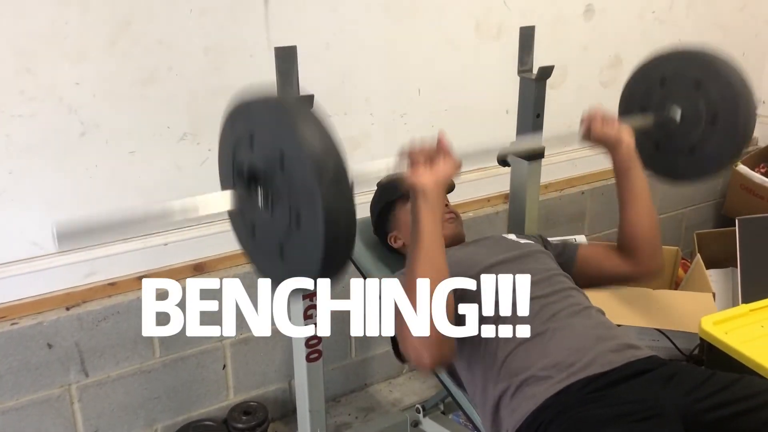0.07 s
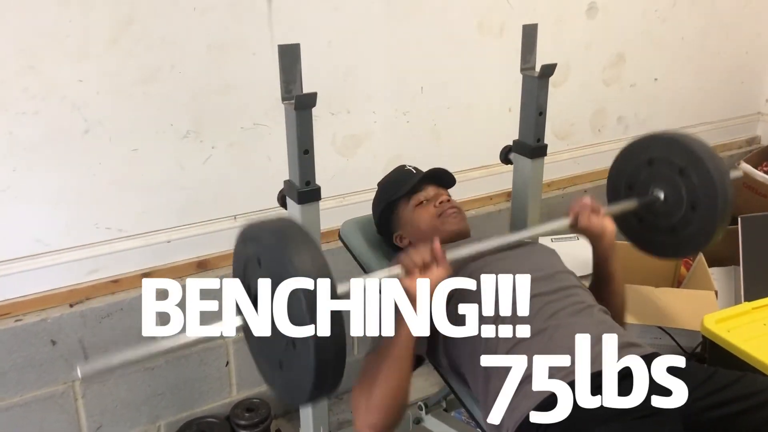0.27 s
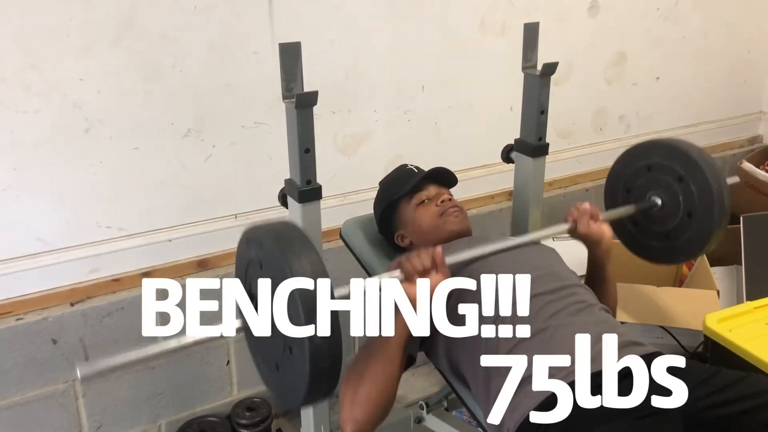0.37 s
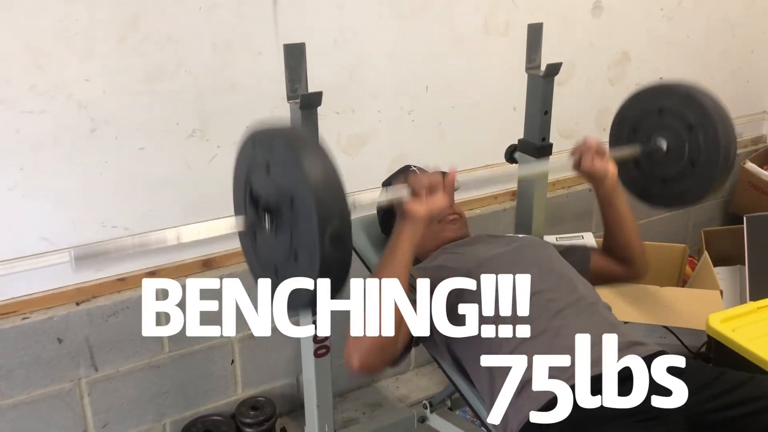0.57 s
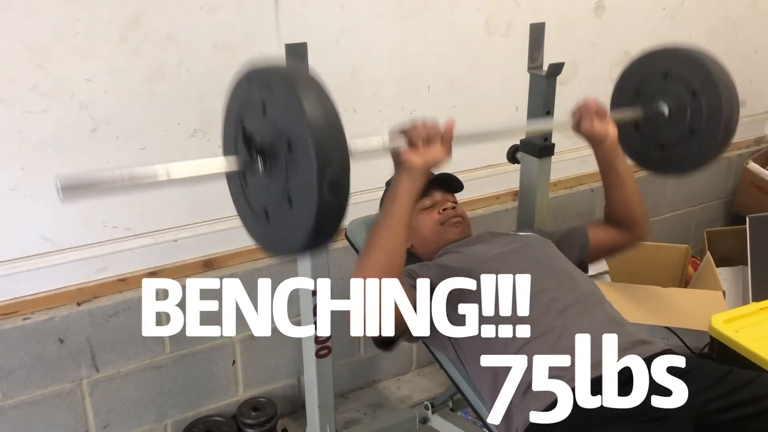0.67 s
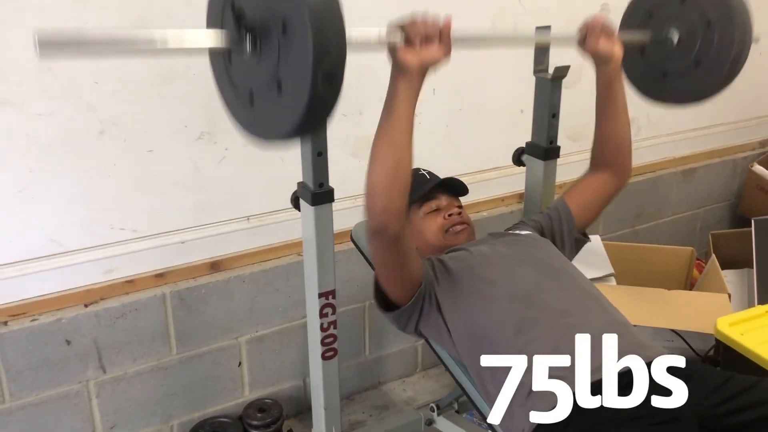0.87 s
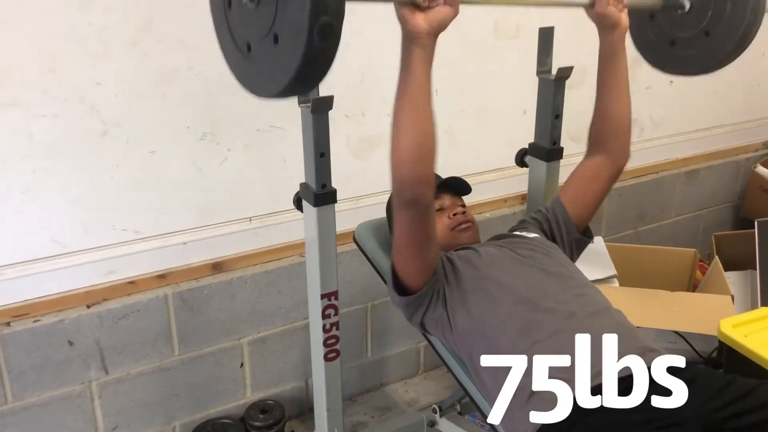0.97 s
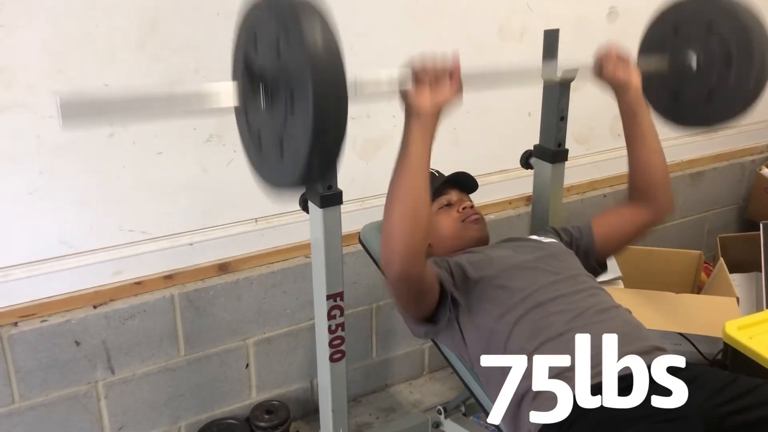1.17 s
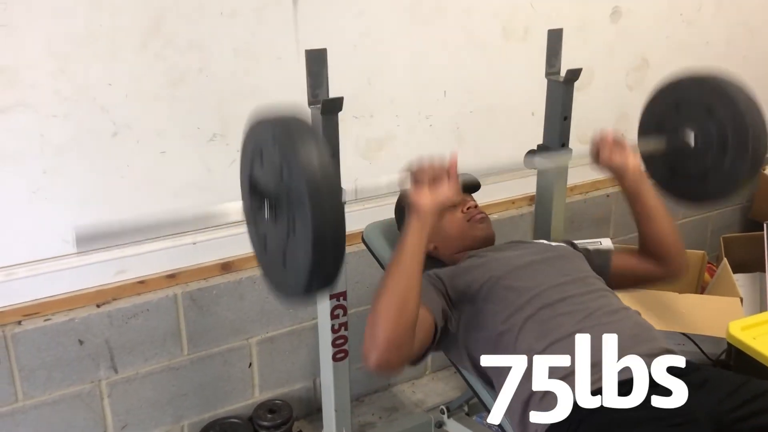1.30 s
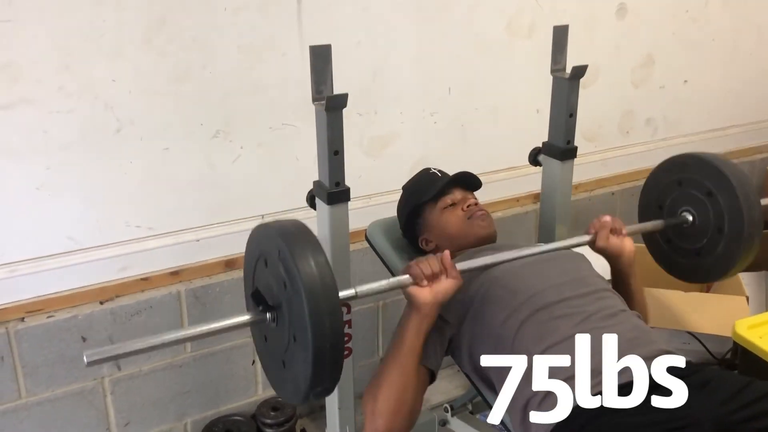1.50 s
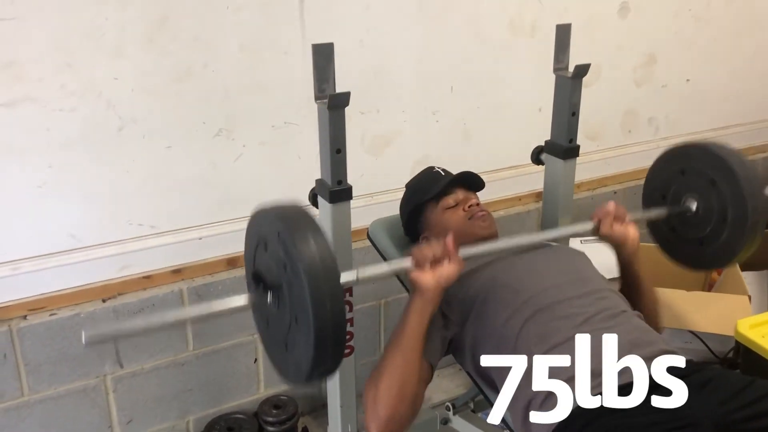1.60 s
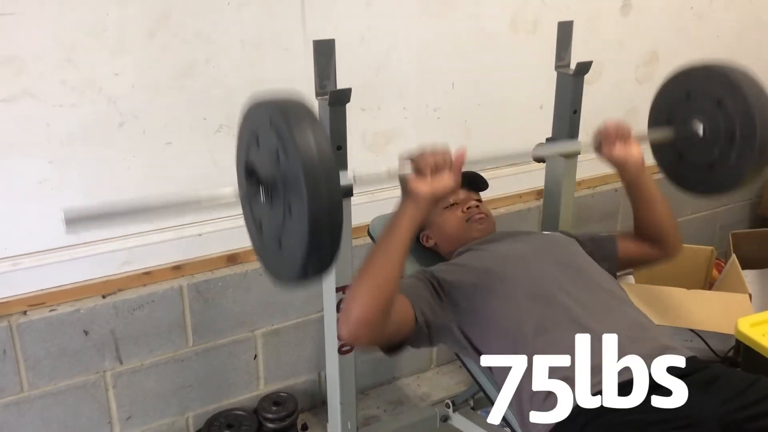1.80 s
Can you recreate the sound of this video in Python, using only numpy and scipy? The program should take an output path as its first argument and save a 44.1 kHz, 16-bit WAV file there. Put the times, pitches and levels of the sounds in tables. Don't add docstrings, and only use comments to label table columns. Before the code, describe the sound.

Metal barbell plates and collar knock together, ringing briefly in a bare, hard-walled room over faint hum

```python
import sys
import numpy as np
from scipy import signal
from scipy.fft import rfft, irfft, next_fast_len
from scipy.io import wavfile
from scipy.ndimage import uniform_filter1d

SR = 44100
rng = np.random.default_rng(int(sys.argv[2]) if len(sys.argv) > 2 else 0)


def store_wav(level_fs):
    pcm = np.round(np.clip(np.atleast_2d(level_fs), -1, 1) * 32767)
    wavfile.write(sys.argv[1], SR, pcm.T.astype(np.int16))


def volts_from_decibels(level):
    exponent = np.asarray(level, float) / 20
    return 10 ** exponent


N = 81585
LEAD = SR // 4
SIZE = next_fast_len(N + 2 * SR)
FREQ = np.maximum(np.fft.rfftfreq(SIZE, 1 / SR), 1)


def collar_knocks(room):
    # (frequency [Hz], level [dB], time to fall 60 dB [s])
    modes = [(2355, -15, .4), (3246, -16, .3), (4210, -14, .4), (4630, -12, .25), (5073, -16, .15),
             (5144, -14, .15), (5992, -13, .44), (6754, -12, .4), (6898, -3, .2), (7803, -5, .22),
             (8911, 0, .24), (9900, -10, .31), (10240, -6, .27)]
    # (frequency [Hz], level [dB per Hz])
    tone = [(120, -51), (350, -15.5), (700, -12.5), (1500, -13.5), (3200, -10), (5000, -8.5), (7000, -6.5),
            (16000, -21)]
    # (time [s], level [dB], chatter length [s], brightness [dB per octave])
    hits = [
        (.1995, -25.5, 0.0027, 2.5),
        (.2033, -24.5, 0.0012, -4),
        (.2095, -23, 0.014, -2),
        (.222, -23, 0.016, 0.),
        (.243, -22.5, 0.023, -2.5),
    ]
    return struck(hits, room, modes, tone, modes_db=-5.5, ring_share=0.22, crowd_t60=0.044)


def sleeve_knocks(room):
    # (frequency [Hz], level [dB], time to fall 60 dB [s])
    modes = [(2374, -7, 0.25), (2837, -3, 0.29), (3381, -2, 0.31), (4646, -7, 0.28), (6029, -15, 0.48),
             (7095, 0, 0.27), (7580, -2, 0.32), (8258, -4, 0.28), (9308, -4, 0.35), (9582, -4, 0.27)]
    # (frequency [Hz], level [dB per
    # Hz])
    tone = [(300, -13.5), (1300, -1.5), (2600, 3), (4500, -4.5), (6300, -10.5), (7300, -2.5), (12000, -10),
            (14000, -25)]
    # (time [s], level [dB], chatter length [s], brightness [dB per octave])
    hits = [
        (.704, -27.5, 0.0018, 0.2),
        (.708, -31, 0.00078, -4),
        (.721, -43.5, 0.0024, -1.5),
    ]
    return struck(hits, room, modes, tone, modes_db=-8.5, ring_share=0.4, crowd_t60=0.0047)


def plate_knocks(room):
    # (frequency [Hz], level [dB], time to fall 60 dB [s])
    modes = [(689, -12, .6), (759, -3, .5), (834, -7, .4), (1018, -12, .4), (1325, -8, .25),
             (1577, -6, .15)]
    # (frequency [Hz], level [dB per Hz])
    tone = [(150, -42), (400, -17.5), (750, -2.5), (1400, -7.5), (2800, -22), (6000, -28.5), (16000, -34.5)]
    # (time [s], level [dB], chatter length [s], brightness [dB per octave])
    hits = [
        (-.16, -42.5, 0.026, 2),
        (.918, -68, 0.0042, -8.5),
        (.930, -50, 0.016, 0.5),
        (.937, -40, 0.0045, 4),
        (.945, -35.5, 0.013, -1),
        (.960, -36, 0.023, 1.5),
        (1.005, -51, 0.0066, -1.),
    ]
    return struck(hits, room, modes, tone, modes_db=-4, ring_share=0.34, crowd_t60=0.051)


def stack_knocks(room):
    # (frequency [Hz], level [dB], time to fall 60 dB [s])
    modes = [(735, -6, .5), (845, -5, .34), (950, -12, .3), (1127, -3, .3), (1319, -10, .3),
             (1640, -7, .12)]
    # (frequency [Hz], level [dB per Hz])
    tone = [(150, -32.5), (500, -6.5), (1100, 1.5), (1900, -13.5), (3000, -19.5), (6000, -32),
            (16000, -34.5)]
    # (time [s], level [dB], chatter length [s], brightness [dB per octave])
    hits = [
        (1.052, -34.5, 0.0099, 2),
        (1.066, -32.5, 0.0066, -0.6),
        (1.0775, -30.5, 0.0025, 0.5),
        (1.085, -34.5, 0.014, 1),
        (1.105, -38, 0.0071, 0.3),
    ]
    return struck(hits, room, modes, tone, modes_db=-7.5, ring_share=0.19, crowd_t60=0.061)


def rim_knocks(room):
    # (frequency [Hz], level [dB], time to fall 60 dB [s])
    modes = [(1314, -12, 0.2), (1712, -18, 0.2), (3278, -12, 0.15), (4823, -6, 0.2), (6158, -4, 0.25),
             (8236, -7, 0.21), (8947, -11, 0.34), (9685, -8, 0.3), (11090, -10, 0.23)]
    # (frequency [Hz], level [dB per Hz])
    tone = [(150, -19), (600, -7), (1500, -7), (2900, -10.5), (4900, -10.5), (6500, -9), (16000, -12)]
    # (time [s], level [dB], chatter length [s], brightness [dB per octave])
    hits = [
        (1.466, -50.5, 0.014, -3.5),
        (1.4755, -37.5, 0.0024, 2.5),
        (1.478, -33.5, 0.0046, 1.),
        (1.485, -46, 0.046, -3.4),
        (1.515, -35.5, 0.0066, -2.2),
        (1.525, -40, 0.028, -5),
    ]
    return struck(hits, room, modes, tone, modes_db=-11.0, ring_share=0.14, crowd_t60=0.0085)


def light_ticks(room):
    # (frequency [Hz], level [dB per Hz])
    tone = [(2500, -20), (5500, -16), (9000, -18), (16000, -15)]
    # (time [s], level [dB], chatter length [s], brightness [dB per octave])
    hits = [(.1306, -63, .001, 0.), (.586, -50, .009, -2.5), (.659, -68, .0004, 3.),
            (.6643, -67, .0008, 7.), (.668, -61, .006, 0.), (.835, -63, .001, 0.), (1.0622, -56, .001, 3.),
            (1.215, -64, .002, 0.), (1.255, -66, .001, 1.), (1.301, -64, .001, -3.),
            (1.3231, -66, .001, 1.), (1.4054, -65, .001, 0.), (1.449, -67, .008, 3.)]
    return struck(hits, room, None, tone, modes_db=0, ring_share=1, crowd_t60=0.0058)


def lone_rings(room):
    # (time [s], frequency [Hz], peak level
    # [dB], time to fall 60 dB [s])
    single_tones = [(.935, 2250, -50, .4), (1.082, 2245, -43, .3), (.95, 2611, -47, .45),
                    (1.078, 2622, -44, .25), (1.072, 3034, -48, .4), (.935, 3415, -53, .4),
                    (1.004, 3420, -44, .4), (1.075, 3418, -49, .6), (.935, 3850, -55, .5),
                    (1.072, 3822, -50, .5), (.94, 4274, -42, .2), (1.02, 4270, -51, .15),
                    (1.075, 4274, -48, .17), (1.13, 4247, -55, .45), (.945, 4730, -54, .3),
                    (1.08, 4721, -60, .35), (.93, 5776, -48, .35), (1.07, 5770, -54, .3), (.93, 6288, -51, .2),
                    (.952, 6290, -43, .2), (1.075, 6295, -53, .3), (.945, 6824, -48, .3),
                    (1.028, 6821, -53, .2), (1.085, 6821, -58, .4), (.945, 7413, -50, .35),
                    (1.06, 7400, -59, .35),
                    (-.02, 668, -60, .9), (-.005, 1585, -59, .3), (.05, 2611, -73, .6), (.212, 680, -39, .4),
                   (.225, 1793, -40, .5), (.285, 1826, -44, .7), (.2, 3133, -36, .5), (.2, 4822, -31, .3),
                   (.199, 6945, -32, .22), (.203, 8415, -35, .4), (.706, 370, -57, .7),
                   (.706, 3500, -51, .45), (.706, 2374, -46, .45), (.917, 690, -52, .2),
                   (.934, 755, -40, .3), (.95, 690, -42, .25), (.956, 1322, -34, .25),
                   (1.058, 725, -37, .6), (1.065, 845, -37, .3), (1.066, 1127, -35, .45),
                   (1.068, 1320, -37, .4), (1.052, 1600, -43, .2), (1.085, 1635, -42, .3),
                   (1.4755, 4700, -36, .06), (1.477, 900, -47, .1), (1.477, 2400, -45, .12),
                   (1.513, 5200, -38, .07), (1.514, 3260, -48, .12), (1.514, 900, -46, .12),
                   (1.545, 1780, -52, .4), (.2, 3246, -37, .6), (.2, 2355, -41, .5), (.199, 6500, -38, .1),
                   (.716, 7095, -45, .35), (.706, 9560, -46, .4), (.6635, 8800, -50, .03),
                   (.6635, 9700, -48, .03), (1.063, 765, -36, .12), (1.49, 4760, -53, .3),
                   (1.505, 6158, -52, .25), (1.18, 1630, -55, .5), (1.3, 3418, -72, .3)]
    rise_s, room_share = .002, .4
    wobble_db, wobble_s = 2.5, .012
    length, width = SR // 2, int(wobble_s * SR)
    t = (np.arange(SIZE) - LEAD) / SR
    out = np.zeros(SIZE)
    for start, hz, db, t60 in single_tones:
        first = LEAD + int(start * SR)
        span = slice(first, first + length)
        age = np.maximum(t[span] - start, 0)
        wobble = uniform_filter1d(uniform_filter1d(rng.standard_normal(length), width), width)
        level_db = db - 60 * age / t60 + wobble_db * wobble / wobble.std()
        swell = 1 - np.exp(-age / rise_s)
        out[span] += volts_from_decibels(level_db) * swell * np.sin(2 * np.pi * hz * age)
    return rfft(out) * (1 + room_share * (room - 1))


def struck(hits, room, modes, tone, modes_db, ring_share, crowd_t60, count=300):
    # (frequency [Hz], level [dB])
    port = [(7000, 1), (9500, 7.5), (10800, 2.5), (11600, -3.5), (16000, -12)]
    drive = knocks(hits) * room
    draw = rng.random((count, 2))
    hz = 150 + 16000 * ((np.arange(count) + draw[:, 0]) / count) ** 1.5
    t60 = crowd_t60 * (.5 + draw[:, 1])
    crowd = drive * rfft(ring(hz, 10 * np.log10(hz) / 3, t60, 1 / 8), SIZE)
    colour = volts_from_decibels(read(tone, FREQ) + read(port, FREQ))
    crowd = crowd * causal(colour / np.sqrt(band_power(crowd, share=.05)))
    crowd = crowd * np.linalg.norm(drive) / np.linalg.norm(crowd)
    if modes is None:
        return crowd
    return crowd + volts_from_decibels(modes_db) * strong_modes(drive, modes, ring_share)


def knocks(hits):
    contacts_per_s, scatter_db = 5000, 2
    first_touch, settle_s = 0.62, 0.0016
    out = 0
    for start, db, length, tilt_db in hits:
        draw = rng.random((200, 3))
        when = np.cumsum(-np.log(1 - draw[:, 0])) / contacts_per_s
        when -= when[0]
        size = volts_from_decibels(-scatter_db * np.log(1 - draw[:, 1])) * np.sign(draw[:, 2] - .5)
        size *= np.clip((1.37 * length - when) / (0.22 * length + 1e-4), 0, 1)
        size *= 1 + first_touch * np.exp(-when / settle_s)
        force = np.zeros(SIZE)
        np.add.at(force, (LEAD + (start + when) * SR).astype(int), size)
        gain = volts_from_decibels(db) * np.sqrt((length + 0.0028) * SR)
        tilt = volts_from_decibels(tilt_db * np.log2(np.maximum(FREQ, 400) / 2500))
        out = out + gain * rfft(unit(force)) * tilt
    return out


def strong_modes(drive, modes, ring_share):
    longest_t60_s = 1
    hz, db, t60 = np.array(modes, float).T
    drive_power = uniform_filter1d(np.abs(drive) ** 2, size=60)
    db = db - 10 * np.log10(np.interp(hz, FREQ, drive_power))
    out = drive * rfft(ring(hz, db, np.clip(t60, .02, longest_t60_s) * ring_share, 1 / 2), SIZE)
    return out * np.linalg.norm(drive) / np.linalg.norm(out)


def ring(hz, db, t60, length):
    t = np.arange(int(length * SR))[:, None] / SR
    sign = np.sign(rng.standard_normal(len(hz)))
    tones = np.sin(2 * np.pi * hz * t) * np.exp(-np.log(1000) * t / t60)
    return unit(tones @ (sign * volts_from_decibels(db)))


def band_power(spectrum, share):
    total = np.cumsum(np.abs(spectrum) ** 2)
    k = np.arange(len(spectrum))
    lo = (k * (1 - share)).astype(int)
    hi = np.minimum(k * (1 + share) + 40, len(k) - 1).astype(int)
    return (total[hi] - total[lo] + 1e-30) / np.maximum(hi - lo, 1)


def causal(gain):
    cep = irfft(np.log(gain), SIZE)
    cep[1:SIZE // 2] *= 2
    cep[SIZE // 2 + 1:] = 0
    return np.exp(rfft(cep))


def read(table, hz):
    table = np.array(table, float)
    return np.interp(np.log(hz), np.log(table[:, 0]), table[:, 1])


def unit(x):
    return x / np.sqrt(np.sum(x ** 2))


def basement():
    # (frequency [Hz], time to fall 60 dB [s])
    tail_times = [(200, 0.56), (700, 0.69), (2500, 0.59), (7000, 0.42), (12000, 0.23), (16000, 0.23)]
    tail_db, build_s = -5, 0.009
    t = np.arange(SR) / SR
    f = np.maximum(np.fft.rfftfreq(SR, 1 / SR), 1)
    noise = rfft(rng.standard_normal(SR))
    tail = 0
    for hz in 100 * 2 ** np.arange(0, 8, .5):
        window = np.cos(np.pi * np.clip(np.log2(f / hz), -.5, .5)) ** 2
        t60 = read(tail_times, hz)
        tail = tail + irfft(noise * window, SR) * np.exp(-np.log(1000) * t / t60) / np.sqrt(t60)
    tail = tail * (1 - np.exp(-t / build_s))
    return 1 + volts_from_decibels(tail_db) * rfft(unit(tail), SIZE)


def hush():
    # (frequency [Hz], level [dB])
    hum_tone = [(25, -40), (45, -3), (130, -5), (300, -8.5), (800, -8), (2200, -19), (9000, -22.5),
                (16000, -51)]
    # (start [s], length [s], level [dB])
    rubs = [
        (-.1, .3, -66.5),
        (0.584, 0.28, -73),
        (0.868, 0.596, -72),
        (1.447, 0.37, -88),
    ]
    hum_db, hiss_db, fade_s = -62.5, -74.5, 0.083
    hiss_hz, hiss_width_hz = 9640, 3100
    t = np.arange(N) / SR
    hum = irfft(rfft(rng.standard_normal(SIZE)) * volts_from_decibels(read(hum_tone, FREQ)), SIZE)[:N]
    resonance = 1 / (1 + ((FREQ - hiss_hz) / hiss_width_hz * 2) ** 2)
    hiss = irfft(rfft(rng.standard_normal(SIZE)) * resonance, SIZE)[:N]
    swell = volts_from_decibels(hiss_db)
    for start, length, db in rubs:
        swell = swell + volts_from_decibels(db) * np.clip(np.minimum(t - start, start + length - t) / fade_s, 0, 1)
    return np.sqrt(N) * (volts_from_decibels(hum_db) * unit(hum) + swell * unit(hiss))


def scene():
    mic_low_hz, top_limit_hz = 111, 16300
    room = basement() / (1 + (mic_low_hz / FREQ) ** 4)
    barbell = (collar_knocks(room) + sleeve_knocks(room) + plate_knocks(room) + stack_knocks(room)
               + rim_knocks(room) + light_ticks(room) + lone_rings(room))
    barbell = barbell / (1 + (FREQ / top_limit_hz) ** 40)
    return (irfft(barbell, SIZE)[LEAD:LEAD + N] + hush())[None]


def low_pass(x):
    return signal.sosfilt(signal.butter(12, 16460, fs=SR, output="sos"), x)


def record(dry):
    return low_pass(dry)


dry = scene()
out = record(dry)
store_wav(out)
```